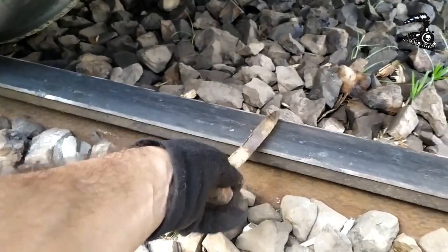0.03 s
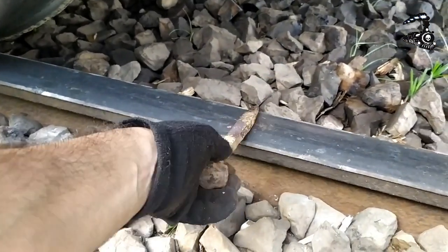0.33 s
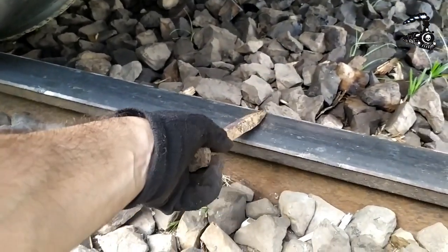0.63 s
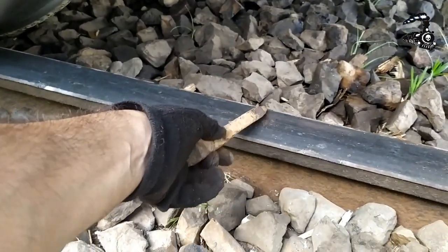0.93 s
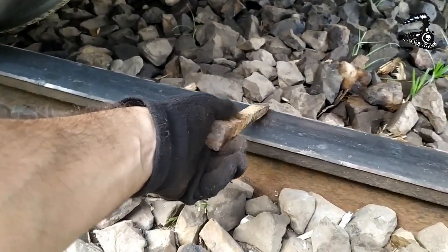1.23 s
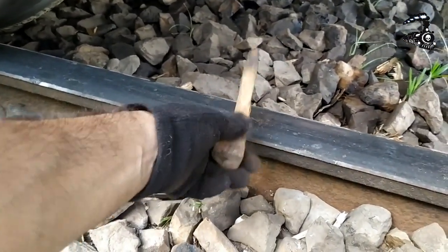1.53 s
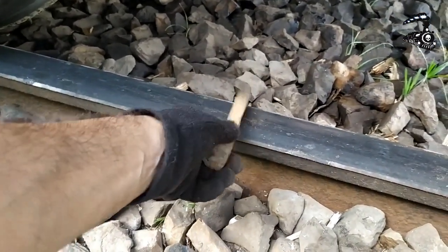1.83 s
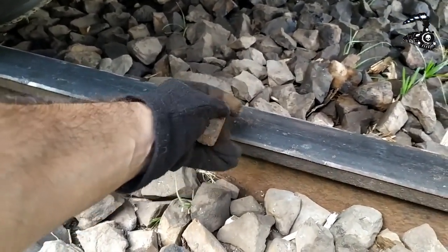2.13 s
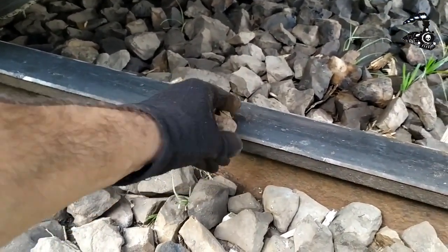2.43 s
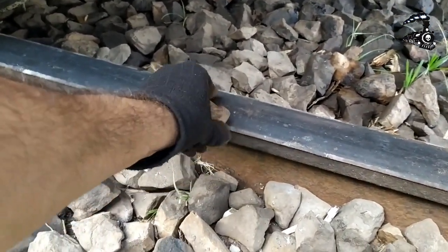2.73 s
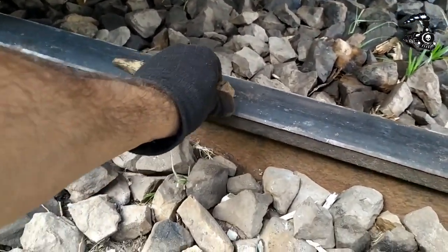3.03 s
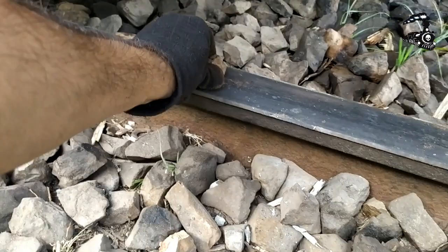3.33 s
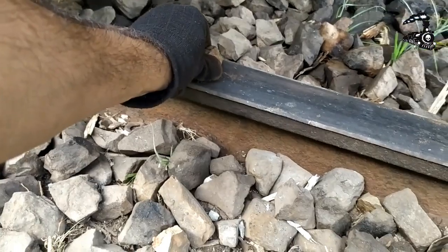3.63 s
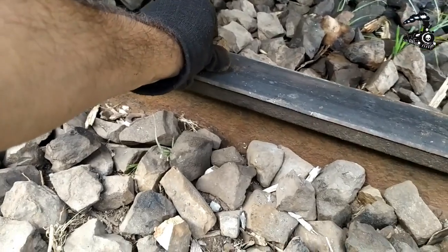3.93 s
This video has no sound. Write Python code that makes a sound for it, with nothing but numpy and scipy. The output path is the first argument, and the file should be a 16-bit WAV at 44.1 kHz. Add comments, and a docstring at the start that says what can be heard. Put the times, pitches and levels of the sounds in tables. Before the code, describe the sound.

Three sharp, bright clinks sound close by as a hand tool taps a railway rail outdoors: a single tap, then a quick pair, each with a short, damped ring. A distant engine's low rumble and light wind continue throughout.

```python
"""Three bright clinks over a low, throbbing rumble and a wash of outdoor air.
A hand-held steel tool taps a railway rail close by: each tap chatters and rebounds,
exciting steel modes that are choked as the tool is pressed down.
The rumble is likely a diesel engine idling some way off. A limiter holds down the clinks' treble."""
import sys
import numpy as np
from scipy import signal
from scipy.fft import rfft, irfft, next_fast_len
from scipy.io import wavfile
from scipy.ndimage import uniform_filter1d, minimum_filter1d, map_coordinates

SR = 44100
rng = np.random.default_rng(int(sys.argv[2]) if len(sys.argv) > 2 else 0)


def wav_out(sig):
    """Save sig, one row per channel (or a flat mono array), as 16-bit PCM at SR to the path in sys.argv[1]."""
    wavfile.write(sys.argv[1], SR, np.round(np.clip(np.atleast_2d(sig).T, -1, 1) * 32767).astype(np.int16))


N = 176400
T = np.arange(N) / SR

# tool-rail contacts: t/s, low modes/dB, high modes/dB, clash/dB, clash t60/s, free ringing/s,
# favoured f/Hz, its boost/dB
CONTACTS = [(0.1682, -4, -7.5, -6, 0.1, 0.034, 2524, 5.5), (.1925, -30, -15.5, -21, .06, 0.053, 2524, 27),
            (.2072, -20, -20, -14, .03, .005, 7600, 9), (1.4668, -7, -2.5, -2.5, 0.077, .17, 7600, 5.5),
            (1.474, -30, -7.5, -2, 0.067, .02, 7600, 11), (1.486, -30, -15, -12, .06, .09, 7600, 5),
            (1.5535, -19.5, -27.5, -18.5, 0.094, 0.049, 2524, 7),
            (1.7408, -3, -6, -3, 0.11, 0.068, 13700, 14), (1.7943, -10.5, -9.5, -10, 0.12, 0.023, 13700, 5),
            (1.811, -24.5, -11.5, -24, 0.11, 0.13, 7180, 10), (2.715, -44, -41, -48, .09, .08, 6870, 11)]


def amp(db):
    """Decibels to gain."""
    return 10 ** (np.asarray(db) / 20)


def unit(x):
    """Scale to rms 1."""
    return x / np.sqrt(np.mean(x ** 2) + 1e-20)


def along(points, hz):
    """Interpolate (f/Hz, value) points on a log axis."""
    f, v = np.transpose(points)
    return np.interp(np.log(hz + 1), np.log(f + 1), v)


def sides(difference):
    """Split a difference: +half left, -half right."""
    return np.array([[.5], [-.5]]) * difference


def wobble(knots_per_s):
    """Smooth random curve."""
    return map_coordinates(rng.standard_normal(4096), [T * knots_per_s + 2], mode="mirror")


def filtered(x, response):
    """Apply a frequency response, ends mirrored."""
    edge = SR // 4
    padded = np.pad(x, [(0, 0)] * (x.ndim - 1) + [(edge, edge)], mode="reflect", reflect_type="odd")
    m = next_fast_len(N + 2 * edge)
    return irfft(rfft(padded, m) * response(np.fft.rfftfreq(m, 1 / SR)), m)[..., edge:edge + N]


def noise(spectrum, channels):
    """Coloured noise, rms 1."""
    white = rng.standard_normal((channels, N))
    return unit(filtered(white, lambda hz: amp(along(spectrum, hz))))


def air():
    """Diffuse outdoor wash: mids lean left, lows and top treble right."""
    # air spectrum: f/Hz, relative density/dB
    spectrum = [(100, -2), (300, -5), (600, -1.5), (970, 2), (1120, -6.5), (1300, -6), (1550, -12.5),
                (2250, -13), (2900, -19.5), (4500, -20), (7000, -26.5), (10000, -34), (12200, -41),
                (14500, -60)]
    # stereo balance: f/Hz, L-R/dB
    balance = [(200, -8.5), (900, 4), (2000, 5), (5000, 0.5), (7000, 0.5), (9500, -4.5), (13000, -11.5)]
    wash = filtered(noise(spectrum, channels=2), lambda hz: amp(sides(along(balance, hz))))
    return amp(-30.5 + .65 * wobble(18)) * wash


def throbbing(x, shaft_hz=5.61):
    """Each band swells once per shaft turn, at its own phase."""
    # throb bands: f/Hz, depth/dB, phase/turns
    bands = [(70, .5, .15), (125, 1.3, .15), (200, 1.3, .72), (290, 2.2, .45), (440, 2.2, .45),
             (650, 1.4, .05)]
    out = np.zeros(N)
    for weights, (_, depth_db, turn) in zip(np.eye(len(bands)), bands):
        shape = [(row[0], weight) for row, weight in zip(bands, weights)]
        swell = amp(depth_db * np.cos(2 * np.pi * (shaft_hz * T - turn)))
        out += filtered(x, lambda hz: along(shape, hz)) * swell
    return out


def engine():
    """Idling engine: close tones beat over a throbbing rumble, reaching the right mic first."""
    # rumble spectrum: f/Hz, relative density/dB
    spectrum = [(15, -26), (26, -11), (40, -4), (70, -1), (92, -1.5), (112, -6), (190, -6), (270, -12.5),
                (420, -13.5), (490, -18), (600, -17), (980, -23.5), (1100, -27.5), (2300, -36.5),
                (4000, -84)]
    # engine tones: f/Hz, rms level/dB
    tones = [(47.5, -18), (50.2, -27.5), (53, -39), (58.5, -22.5), (63.9, -17), (81.3, -30), (86.1, -28.5),
             (128.6, -29.5), (146.7, -43), (175.6, -33), (192.3, -34.5), (212.8, -36.5), (240, -42.5),
             (288, -42), (312.6, -40), (405, -53), (437, -39.5), (582, -42.5), (707, -49), (840, -55),
             (990, -56)]
    # lag between the mics: f/Hz, share of max_lag_s
    lag_share = [(60, 1), (250, 0.64), (550, 0.37), (1000, 0.93)]
    max_lag_s = .00043
    flutter_db = 1.05 * wobble(14)
    out = amp(-20 + flutter_db) * throbbing(noise(spectrum, channels=1)[0])
    for hz, db in tones:
        drift_rad = .3 * np.sqrt(hz / tones[0][0]) * wobble(1.4)
        peak = np.sqrt(2) * amp(db + wobble(3.25))
        out += peak * np.sin(2 * np.pi * (hz * T + rng.random()) + drift_rad)
    return filtered(out, lambda hz: np.exp(-2j * np.pi * hz * sides(max_lag_s * along(lag_share, hz))))


def after_ring(x, level_db=-50, t60_s=.4):
    """Faint diffuse tail from the rail and open surroundings."""
    tail = rng.standard_normal((2, SR)) * amp(-60 * T[:SR] / t60_s)
    return amp(level_db) * signal.fftconvolve(x, tail / np.linalg.norm(tail[0]), axes=1)[:, :N]


def clash():
    """Crack and dense, short-lived modes at each contact; soft contacts are duller."""
    # clash spectrum: f/Hz, relative density/dB
    spectrum = [(500, -26), (1400, -5), (2300, -3), (2800, 5.5), (3200, -6), (4600, 5.5), (6200, 2.5),
                (7400, 2.5), (8800, 0), (11000, 0.5), (13000, 0.5), (15200, -9), (16000, -33)]
    level_db, pan_db, attack_s = -6, 1, .0008
    crack_db, crack_t60_s = -3, .01
    top_hz, top_exponent = 8000, 2.4  # the top grows faster with force
    body_power, top_power = np.zeros(N), np.zeros(N)
    for start_s, _, _, db, t60_s, *_ in CONTACTS:
        age_s = np.maximum(T - start_s, 0)
        decay = amp(-60 * age_s / t60_s)
        crack = amp(crack_db - 60 * age_s / crack_t60_s)
        power = (1 - np.exp(-age_s / attack_s)) * (decay ** 2 + crack ** 2)
        body_power += amp(db) ** 2 * power
        top_power += amp(top_exponent * db) ** 2 * power
    bright = noise(spectrum, channels=2)
    body = filtered(bright, lambda hz: 1 / (1 + (hz / top_hz) ** 6))
    top = bright - body
    return amp(level_db + sides(pan_db)) * (np.sqrt(body_power) * body + np.sqrt(top_power) * top)


def ring():
    """Contacts feed the steel's modes and kick their phase; the pressed-down tool chokes them."""
    # steel modes: f/Hz, level/dB, t60/s, L-R/dB
    modes = [(2524, -18, .2, -7), (2814, 0, .26, 7), (6868, -8, .15, -8), (7180, -9, .15, -7),
             (7600, -6, .13, -4), (13700, -24, .11, -7), (3812, -28, .16, -1), (4614, -13, .09, -4),
             (6300, -18, .06, 0), (7510, -16, .11, 0), (7680, -16, .1, -4), (8441, -18, .06, 7),
             (12330, -20, .06, -4), (12500, -21, .06, -4), (14880, -24, .09, -7), (2000, -27, .1, 6),
             (9566, -21, .09, -7), (9750, -46, .6, -3), (11005, -21, .07, -5), (11800, -46, .5, -4),
             (12900, -50, .5, -4), (15270, -25, .04, 0)]
    low_below_hz, boost_width_hz = 5500, 50
    attack_s, choke_db_per_s, mic_lag_s = .0012, 850, .000095
    out, t = np.zeros((2, N)), np.arange(SR // 2) / SR
    for hz, db, t60_s, pan_db in modes:
        power, kicks_rad = np.zeros(N + SR), np.zeros(N)
        for start_s, low_db, high_db, _, _, free_s, favoured_hz, boost_db in CONTACTS:
            start = round(start_s * SR)
            level_db = db + (low_db if hz < low_below_hz else high_db)
            level_db += boost_db * np.exp(-((hz - favoured_hz) / boost_width_hz) ** 2)
            choke_db = choke_db_per_s * np.maximum(t - free_s, 0)
            envelope = amp(level_db - 60 * t / t60_s - choke_db) * (1 - np.exp(-t / attack_s))
            power[start:start + len(t)] += envelope ** 2
            kicks_rad[start] = .25 * rng.standard_normal()
        jitter_rad = .044 * unit(uniform_filter1d(rng.standard_normal(N), size=120))
        cycles = hz * (T - sides(mic_lag_s)) + rng.random()
        phase = 2 * np.pi * cycles + jitter_rad + np.cumsum(kicks_rad)
        out += amp(sides(pan_db)) * np.sqrt(power[:N]) * np.sin(phase)
    return out


def scene():
    """Clinks in front, engine and air behind."""
    clinks = ring() + clash()
    return clinks + after_ring(clinks) + engine() + air()


def limited(x, ceiling_db, hold_s=.005, smooth_s=.002):
    """Stereo-linked peak limiter."""
    needed = np.minimum(1, amp(ceiling_db) / (np.abs(x).max(axis=0) + 1e-9))
    held = minimum_filter1d(needed, int(hold_s * SR))
    return x * uniform_filter1d(held, int(smooth_s * SR))


def record(dry):
    """Treble limiter, soft clip, band limit."""
    split_hz, cutoff_hz, full_scale = 1500, 16300, .97
    bass = filtered(dry, lambda hz: 1 / (1 + (hz / split_hz) ** 4))
    mix = bass + limited(dry - bass, ceiling_db=1)
    rounded = mix / (1 + np.abs(mix / full_scale) ** 8) ** (1 / 8)
    return filtered(rounded, lambda hz: hz < cutoff_hz)


dry = scene()
out = record(dry)
wav_out(out)
```